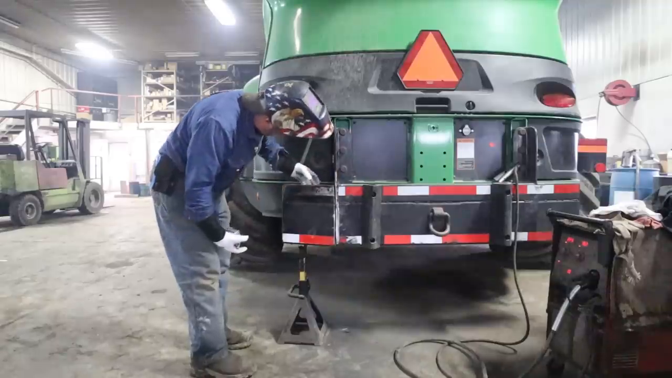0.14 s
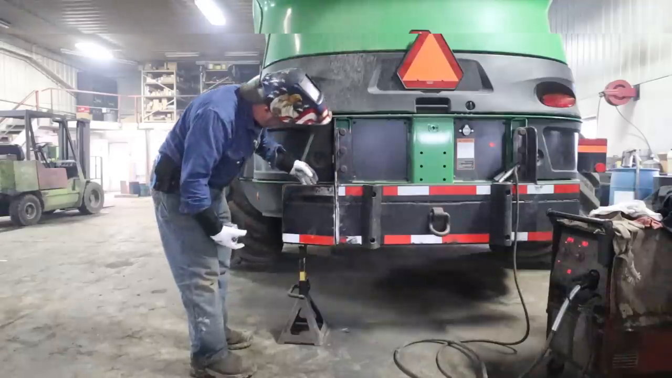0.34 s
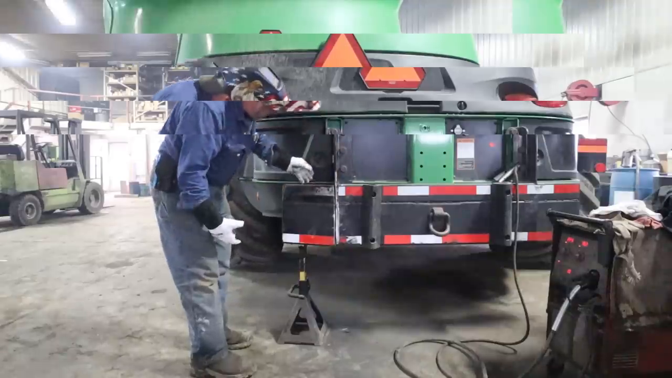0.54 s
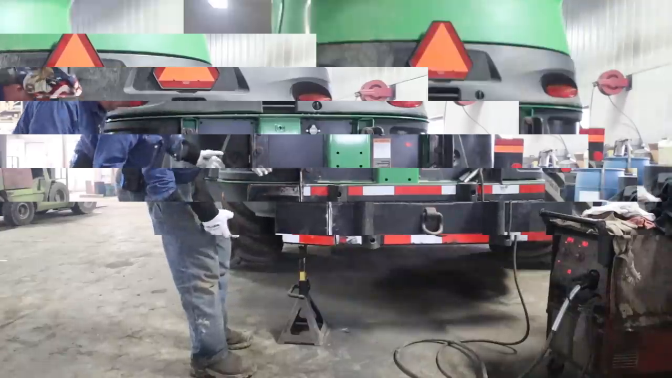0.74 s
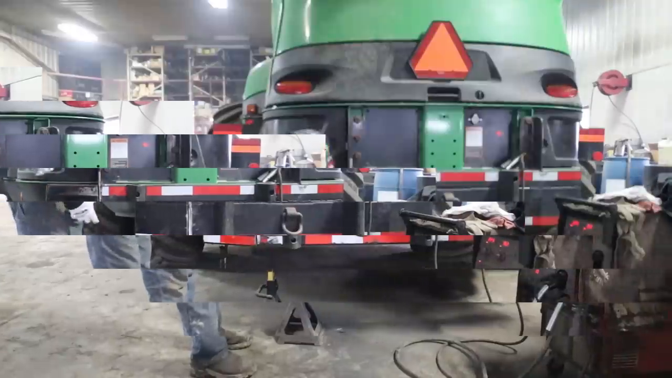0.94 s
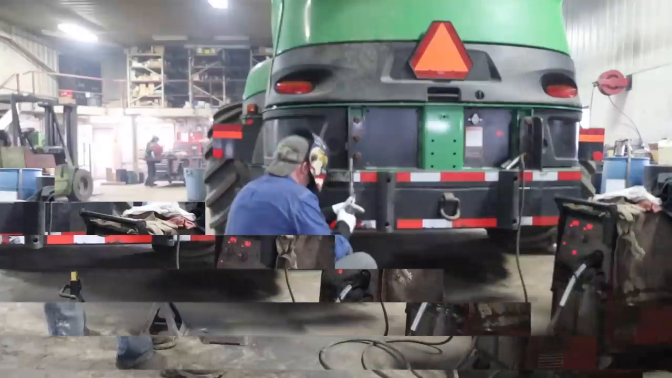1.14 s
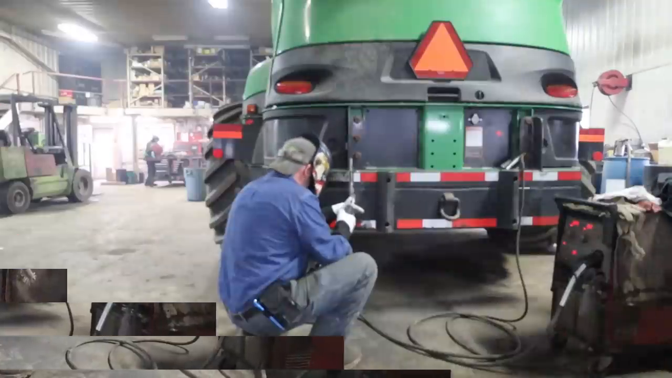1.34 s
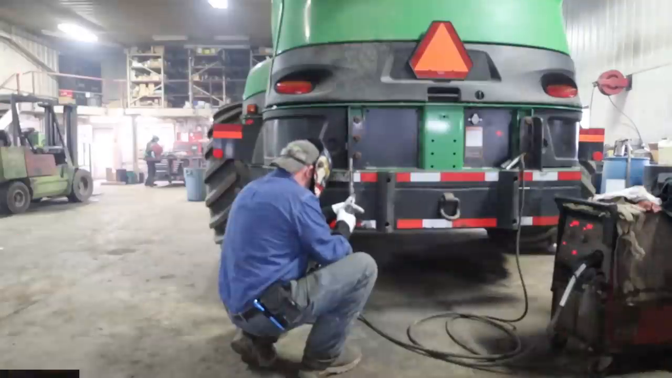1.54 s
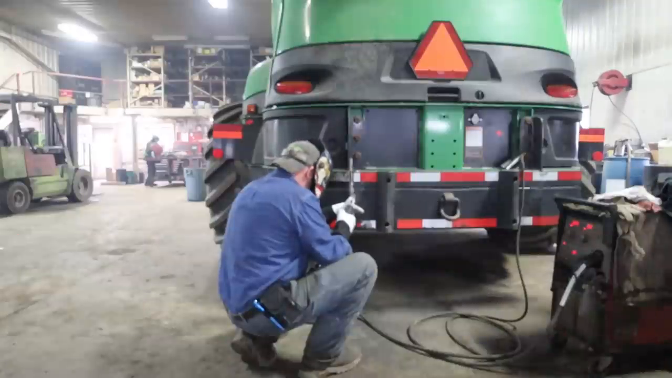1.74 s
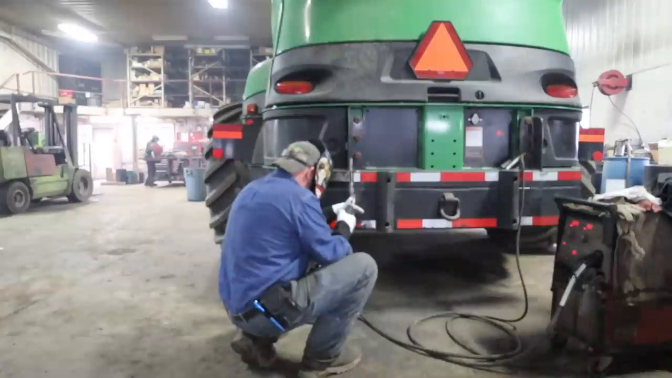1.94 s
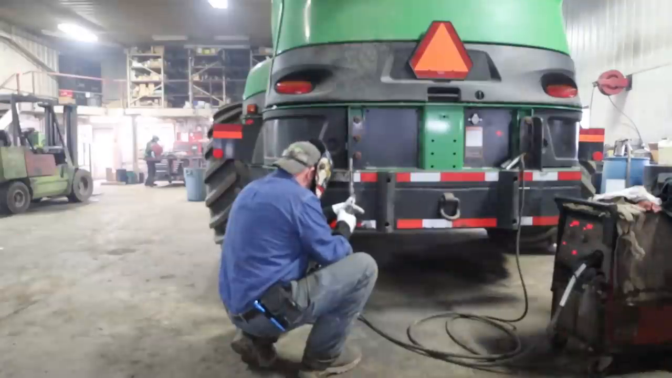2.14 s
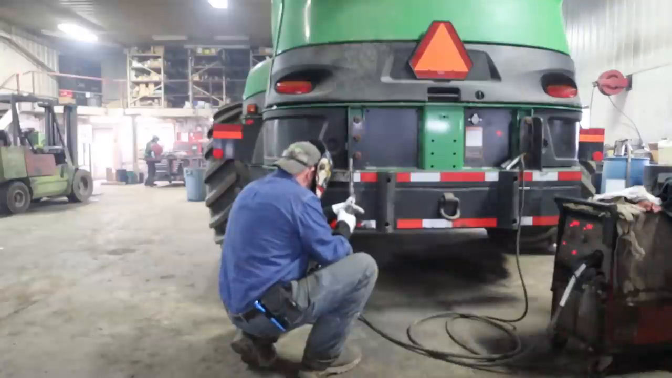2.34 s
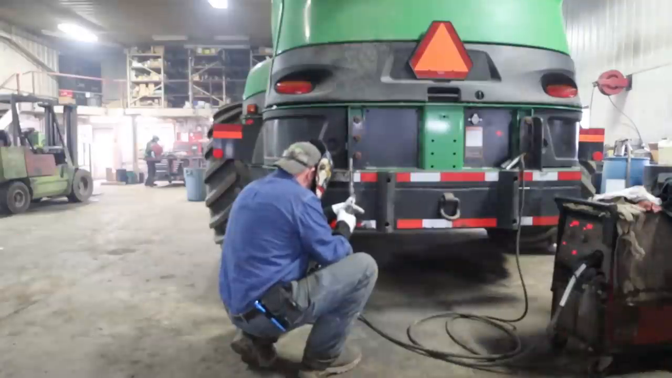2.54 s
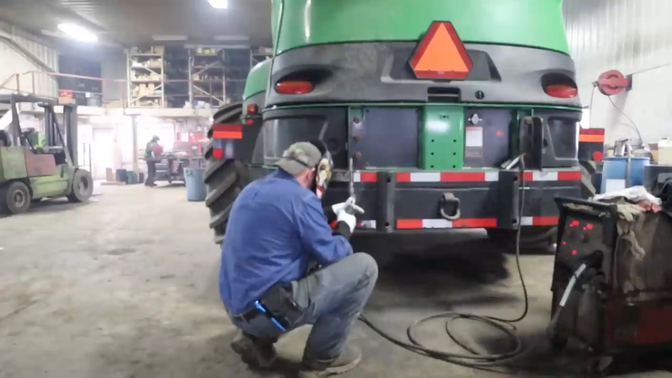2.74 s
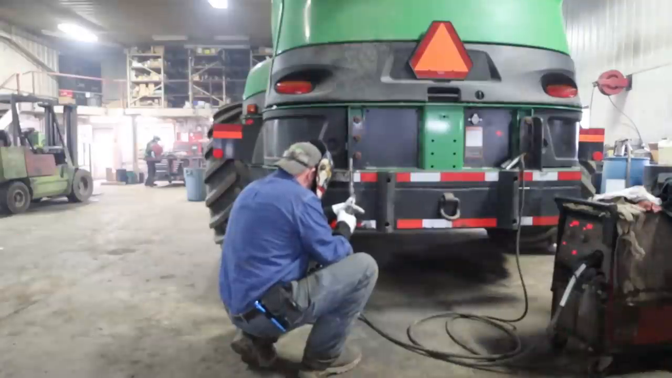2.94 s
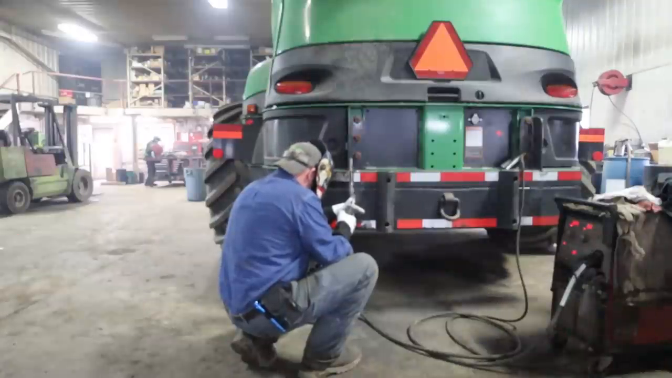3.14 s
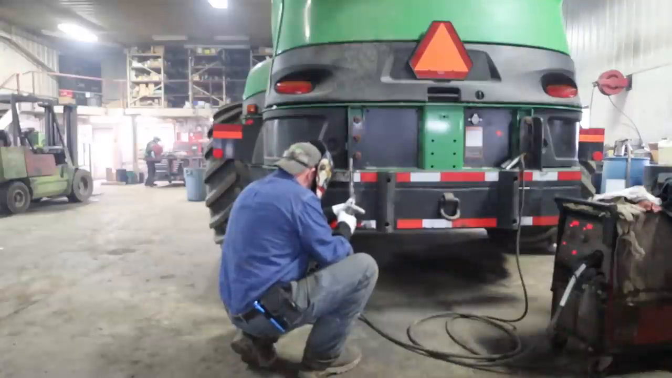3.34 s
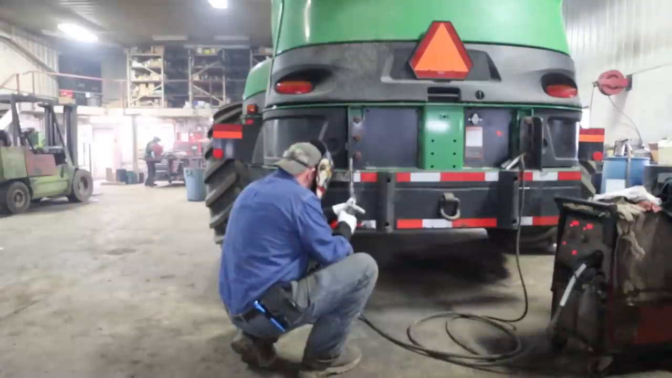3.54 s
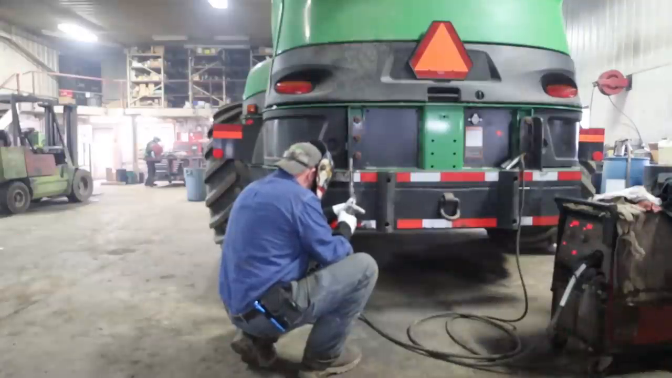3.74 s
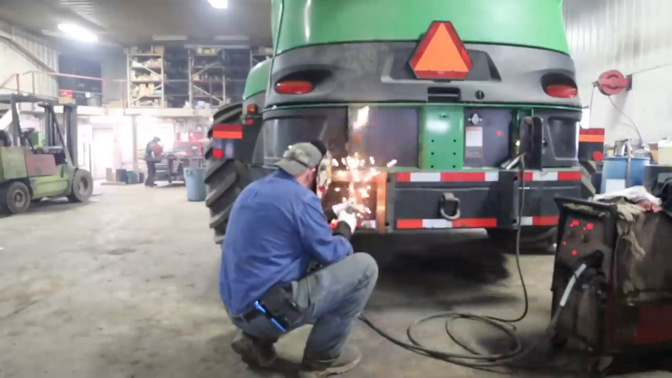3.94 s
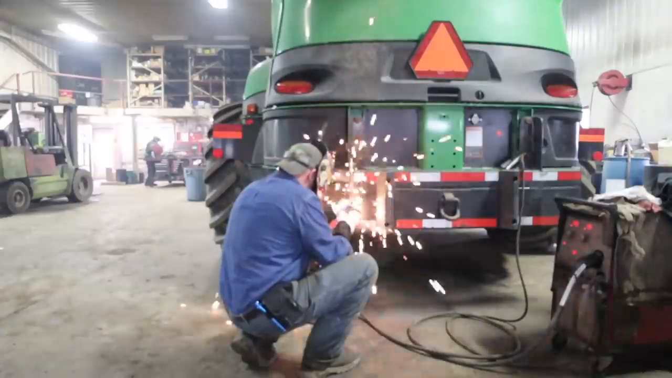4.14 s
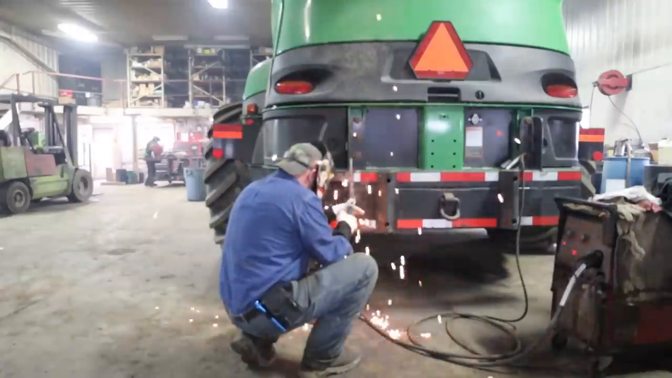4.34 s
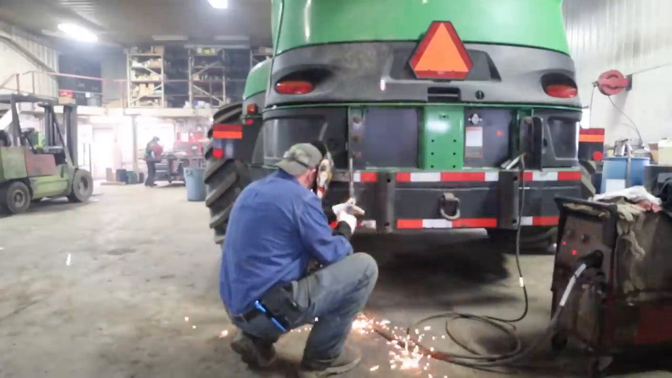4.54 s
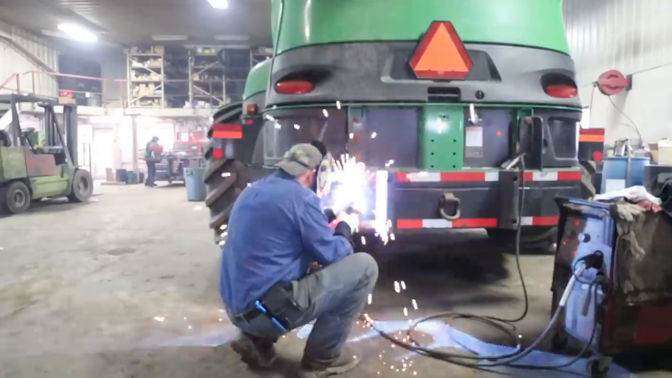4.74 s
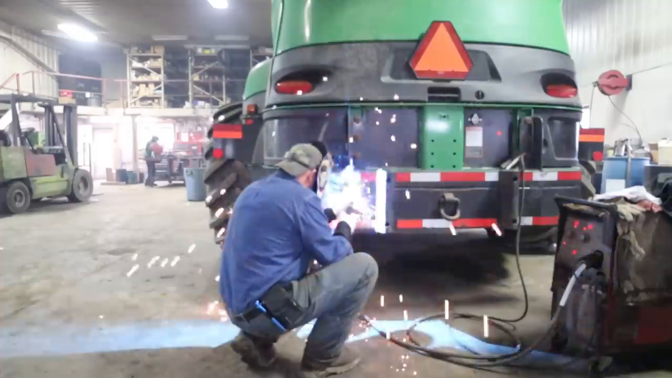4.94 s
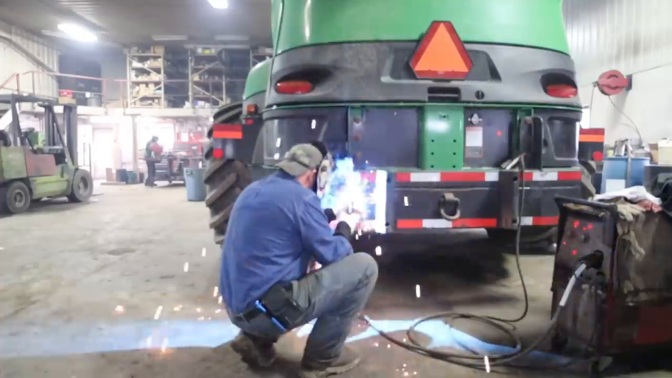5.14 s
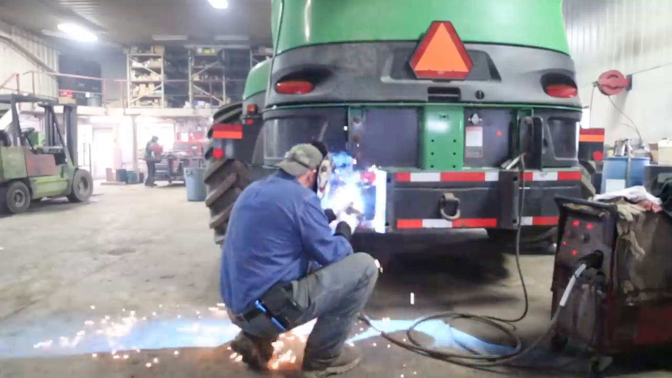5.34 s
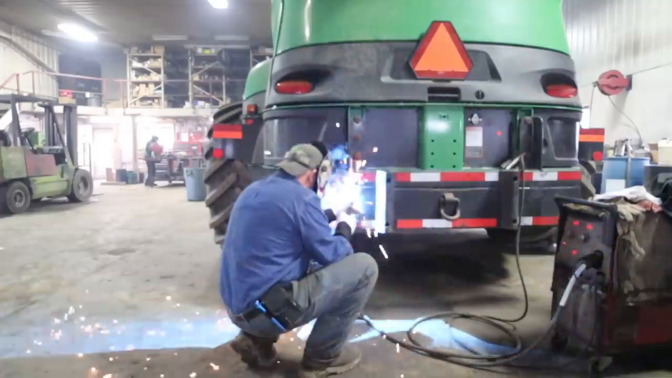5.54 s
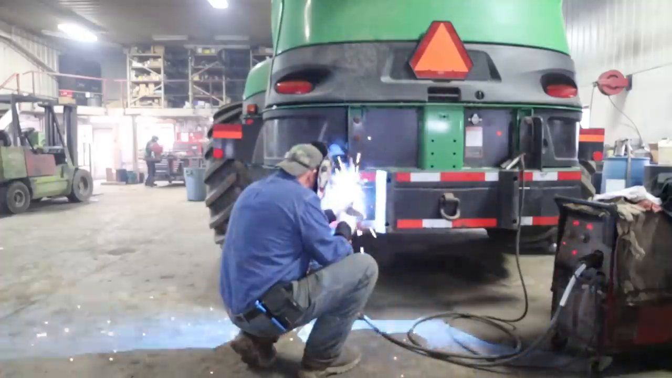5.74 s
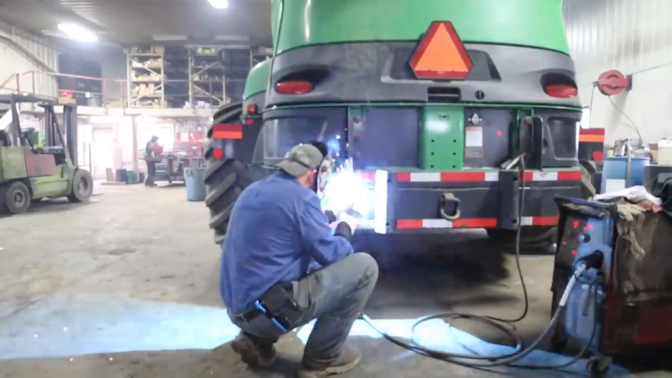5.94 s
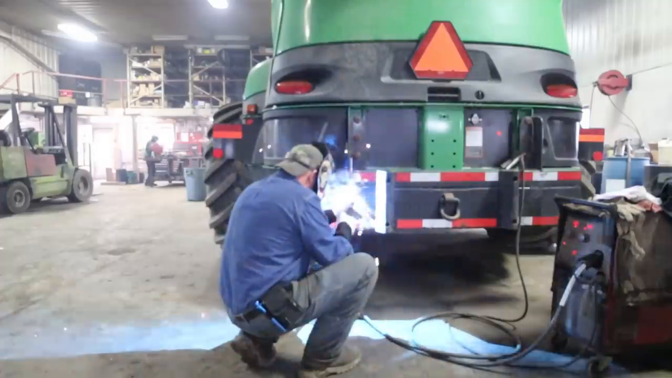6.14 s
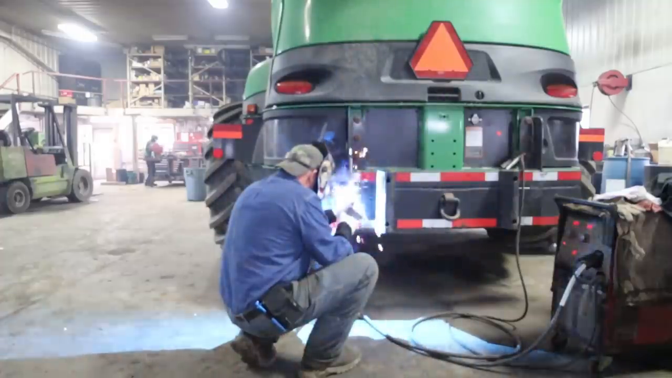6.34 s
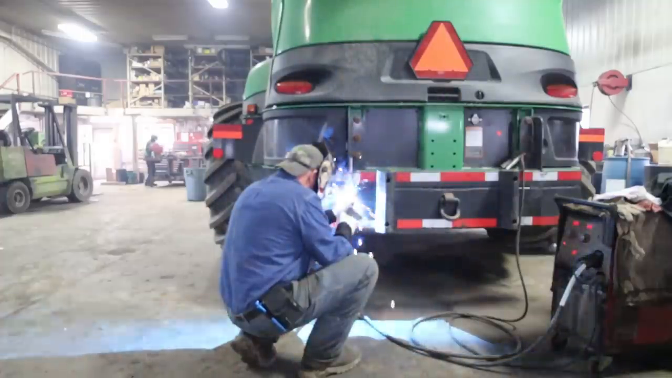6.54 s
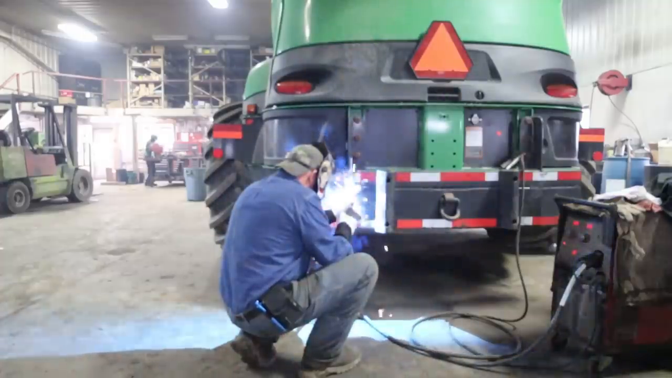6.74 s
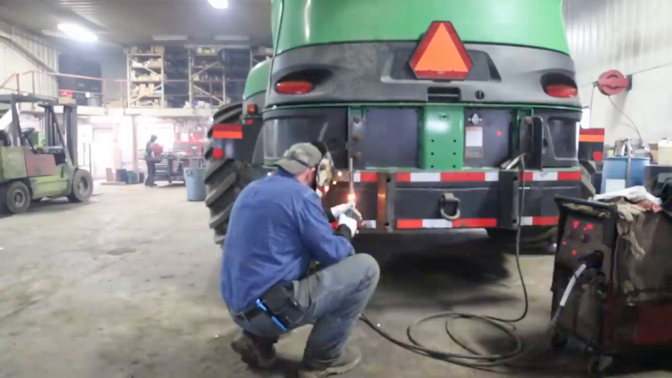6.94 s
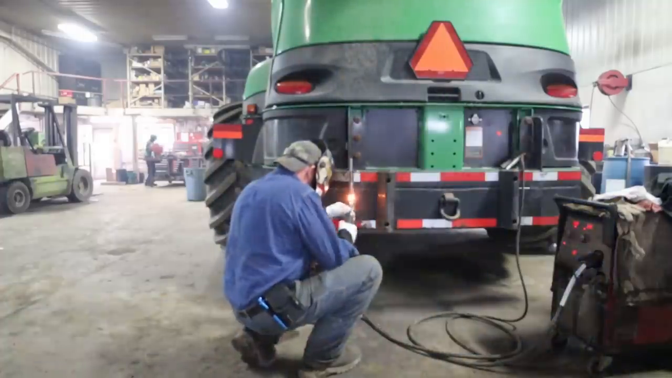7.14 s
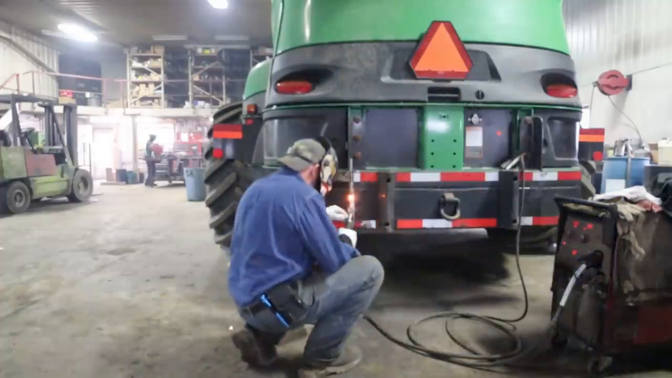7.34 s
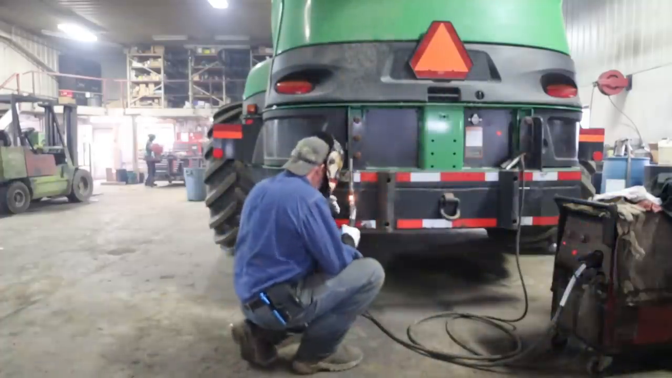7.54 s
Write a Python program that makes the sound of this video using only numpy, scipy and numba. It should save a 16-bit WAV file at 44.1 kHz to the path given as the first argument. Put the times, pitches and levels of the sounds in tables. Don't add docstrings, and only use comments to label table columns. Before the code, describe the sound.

In a big, hard-walled steel workshop, a grinder further off scrapes a bar with a bright ringing roar, whine and low hum, its tone changing early on. Around four seconds a welder a few metres away cracks sharply in bursts, pauses, strikes again, then buzzes and crackles rapidly for two seconds. The level dips under the cracks; grinding remains at the end.

```python
import sys
import numpy as np
from scipy import signal
from scipy.fft import rfft, irfft
from scipy.io import wavfile
from scipy.ndimage import uniform_filter1d, map_coordinates
from numba import njit

SR = 44100
rng = np.random.default_rng(int(sys.argv[2]) if len(sys.argv) > 2 else 0)


def boost_factor(decibels):
    exponent = np.asarray(decibels, float) / 20
    return 10 ** exponent


def generate_wav(sig):
    pcm = np.round(np.clip(np.atleast_2d(sig).T, -1, 1) * 32767).astype(np.int16)
    wavfile.write(sys.argv[1], SR, pcm)


N = 334278
T = np.arange(N) / SR
HZ = np.arange(N // 2 + 1) * SR / N + 1e-3

# start t/s, end t/s
FADE_S = (0.54, 0.95)
# t/s, speed/(turns per s)
SPIN = [(0, 141.3), (.9, 145), (1.45, 147.8), (1.9, 149.3), (2.55, 147.6), (2.8, 146.2), (3.2, 144.2),
        (3.8, 141.3), (4.3, 140.5), (7.58, 140.8)]
# f/Hz, width/Hz, level/dB
BAR_EARLY = [(2115, 23, -32.5), (2595, 60, -34), (3044, 24, -30.5), (4120, 20, -26.5), (3990, 60, -29),
             (4800, 145, -20.5), (6330, 95, -29.5), (7180, 160, -31.5), (8800, 170, -44), (10100, 150, -54),
             (11800, 250, -64), (13100, 300, -61), (14600, 200, -68)]
BAR_LATE = [(2450, 50, -31.5), (2924, 31, -33.5), (3320, 59, -39.5), (4000, 40, -33), (4140, 135, -34),
            (4920, 110, -21), (6285, 45, -21.5), (6120, 27, -29), (7425, 82, -31.5), (8850, 197, -37),
            (10360, 170, -44.5), (11540, 190, -50.5), (13400, 330, -46.5), (15000, 400, -63)]
# f/Hz, level/dB
ROAR_EARLY = [(30, -76), (80, -53), (250, -54), (700, -51.5), (1500, -46), (2800, -35.5), (4400, -35.5),
              (5600, -40.5), (8000, -53), (10800, -74), (15500, -79)]
ROAR_LATE = [(30, -78), (60, -52.5), (110, -43.5), (480, -42.5), (620, -46), (1200, -43), (2000, -38.5),
             (3000, -33), (3700, -39.5), (5700, -40), (8200, -48.5), (9600, -80), (12500, -66),
             (15500, -103)]
# f/Hz, level/dB
HUM_EARLY = [(91.5, -45.5), (457.6, -51)]
HUM_LATE = [(134.6, -41.5), (269.2, -45.5), (409.1, -44), (543.7, -40.5)]
# t/s, level/dB
SHOP_GAIN = [
    [(0, -14), (.3, -14.5), (.7, -14.5), (1, -15), (1.3, -13), (1.8, -12.5), (2.7, -12.5), (3.4, -13),
     (3.97, -12)],
    [(3.985, -11.5), (4.1, -16), (4.68, -18.5), (4.72, -20), (5.4, -21), (6, -23.5), (6.7, -24.5),
     (7.15, -23), (7.4, -21)],
]
# t/s, pop level/dB, spatter length/ms, spatter level over the pop/dB
STRIKES = [(3.9767, 7, 2.1, -6), (3.9784, 5, 2.7, 4.5), (4.0395, -16, 2.5, -10), (4.1281, 3.5, 9.5, 0),
           (4.1433, 3.5, 3.2, -1.5), (4.1547, 2, 3.6, -6), (4.178, -2, 3.9, -1.5), (4.688, 7, 2.23, -5),
           (4.705, -20, 2.6, -14), (4.834, -18, 3.4, 4), (4.858, -11, 3.9, 2.5), (4.945, -11.5, 3.5, 1),
           (4.8251, -16, 1.2, -19), (4.8334, -1.5, 0.74, -11), (4.8404, -14, 1.2, -19),
           (4.8575, -8, 1.8, -19), (4.8757, -17, 1.2, -19), (6.899, -9, 6.4, -2)]
# arc on t/s, arc off t/s
ARC_S = (4.9, 6.9)
# t/s, level/dB, droplets up to the next (count), droplet level/dB
SHORTS = [(4.9079, -13, 0, -12), (4.9196, -1, 10, -9), (5.0177, -2, 1, -4), (5.0373, -15, 8, -10),
          (5.1041, -3, 13, -10), (5.2192, -5, 5, -10), (5.2748, -8, 10, -10), (5.4148, -10, 4, -8),
          (5.4701, -9, 4, -8), (5.5367, -3, 1, -5), (5.5598, 0, 5, -6), (5.6385, -7, 2, -11),
          (5.6708, -5, 15, -7), (5.8513, -12, 4, -7), (5.8942, -11, 2, -4), (5.9412, -9, 1, -17),
          (5.96, -7, 2, -6), (6.0104, -1, 0, -12), (6.0238, -5, 4, -8), (6.0692, -2, 4, -8),
          (6.1207, -4, 1, -12), (6.1554, 1, 9, -10), (6.253, -3, 8, -12), (6.3396, -7, 9, -12),
          (6.4443, -13, 7, -10), (6.5144, -11, 0, -12), (6.5355, -8, 11, -11), (6.6473, -9, 8, -10),
          (6.7399, 0, 16, -9), (6.8999, -16, 0, -12)]
# delay/ms, level/dB
ECHOES = [(.33, -9), (.59, -14), (1.94, -9), (2.14, -10), (3.265, -12.5), (4.575, -15.5), (6.46, -24)]

FAST_TURNS, FAST_WHINE_DB, FAST_RING_HZ, FAST_RING_DB = (142.6, 149), 9, 6270, 5.5
EASE_S, EASE_DB, EASE_HZ, EASE_WIDTH_HZ, HUM_LATER_DB = (3, 4.4), -2.5, 2920, 760, -2
FAR_T60_S, FAR_DB, FAR_FROM_HZ = .3, -4, 4300
ARC_RUMBLE_DB, ARC_HISS_DB, LIFT_RISE_S, LIFT_FALL_S = 3, 3.5, 0.53, .02
BEAT_JITTER_MS, BEAT_SCATTER_DB = .5, 2.2
POP_SPATTER_MS, POP_SPATTER_DB = 1.2, -16.5
BODY_DB, BODY_FOLLOW = -9, .35
NOZZLE_HZ, NOZZLE_WIDTH_HZ, NOZZLE_DB = 7710, 1140, 23.5
BOX_HZ, BOX_WIDTH_HZ, BOX_DB, BOX_MS, STRIKE_BOX_DB = 430, 48, 12.5, 1.54, -20
THUD_HZ, THUD_WIDTH_HZ, THUD_DB = 480, 1700, 3
HALL_T60_S, HALL_DB = 0.49, -6.5


def noise():
    return rng.standard_normal(N)


def shape(x, gain):
    return irfft(rfft(x) * gain, N)


def resonance(hz, width_hz):
    return 1 / (1 + 1j * (HZ / hz - hz / HZ) * hz / width_hz)


def delay(ms):
    return np.exp(-2j * np.pi * HZ * ms / 1000)


def walk(rate):
    k = int(SR / rate)
    held = np.repeat(rng.standard_normal(N // k + 1), k)
    return 1.3 * uniform_filter1d(uniform_filter1d(held, k), k)[:N]


def decaying_tail(t60_s, start_s=-1):
    tail = noise() * boost_factor(-60 * T / t60_s) * (T > start_s)
    return rfft(tail / np.sqrt(np.sum(tail ** 2)))


def disc(turns, wear_s=.22):
    rim = rng.standard_normal((40, 300))
    rub = map_coordinates(rim, [T / wear_s, turns % 1 * 300], order=1, mode="grid-wrap")
    return rub / rub.std()


def bar_rings(bar, rub, fast, bright_db):
    out = 0
    for hz, width_hz, db in bar:
        ring = shape(noise() + rub, resonance(hz, width_hz))
        lift_db = bright_db * np.clip((hz - 5500) / 3000, 0, 1)
        if abs(hz / FAST_RING_HZ - 1) < 1 / 25:
            lift_db = lift_db + FAST_RING_DB * fast
        swell_db = 0.93 * walk(2.924) + 1.54 * walk(30)
        out = out + boost_factor(db + lift_db + swell_db) * ring
    return out


def grinding_roar(roar, rub, rumble_db, bright_db):
    grit = noise() * boost_factor(rng.exponential(size=N))
    grit = grit / grit.std()
    hz, db = np.transpose(roar)
    colour = boost_factor(np.interp(np.log(HZ), np.log(hz), db))
    low = 1 / (1 + (HZ / 1100) ** 4)
    high = 1 / (1 + (6500 / HZ) ** 6)
    middle = np.clip(1 - low - high, 0, 1)
    rumble = boost_factor(rumble_db + 1.2 * walk(7.6)) * shape(noise(), colour * np.sqrt(low))
    scrape = boost_factor(1.1 * walk(8.5)) * shape(grit + rub, colour * np.sqrt(middle))
    hiss = boost_factor(bright_db + 0.74 * walk(8.6)) * shape(grit, colour * np.sqrt(high))
    return rumble + scrape + hiss


def vane_whine(turns, fast, whine_db):
    return boost_factor(whine_db + FAST_WHINE_DB * fast + 2.5 * walk(9)) * np.sin(2 * np.pi * 20 * turns)


def motor_hum(hum):
    waver = np.cumsum(1 + .004 * walk(5)) / SR
    lines = sum(boost_factor(db + 1.8 * walk(14)) * np.sin(2 * np.pi * hz * waver) for hz, db in hum)
    return lines * boost_factor(np.interp(T, EASE_S, [0, HUM_LATER_DB]))


def far(x):
    treble = 1 / (1 + (FAR_FROM_HZ / HZ) ** 4)
    paths = boost_factor(FAR_DB) * decaying_tail(FAR_T60_S) * treble
    return shape(x, (1 + paths) / np.sqrt(1 + boost_factor(2 * FAR_DB) * treble ** 2))


def grinder(bar, roar, hum, rumble_db, bright_db, whine_db):
    speed = np.interp(T, *np.transpose(SPIN))
    turns = np.cumsum(speed * (1 + .0012 * walk(8))) / SR
    fast = np.interp(speed, FAST_TURNS, [-1, 0])
    rub = boost_factor(-3) * shape(disc(turns), resonance(3100, 3000) ** 2)
    scraping = bar_rings(bar, rub, fast, bright_db) + grinding_roar(roar, rub, rumble_db, bright_db)
    whine = vane_whine(turns, fast, whine_db)
    return far(scraping) * boost_factor(37.5) + whine * boost_factor(25.0) + motor_hum(hum) * boost_factor(15.5)


def clicks(s, size):
    at = np.asarray(s) * SR
    i, part = at.astype(int), at % 1
    first = np.bincount(i, size * (1 - part), N + 2)[:N]
    return first + np.bincount(i + 1, size * part, N + 2)[:N]


def droplets():
    rows = []
    for (s, db, count, beat_db), after in zip(SHORTS, SHORTS[1:] + SHORTS[-1:]):
        beat = np.linspace(s, after[0], int(count) + 2)[1:-1]
        chance = rng.standard_normal((len(beat), 2)).clip(-2, 2)
        beat_s = beat + BEAT_JITTER_MS / 1000 * chance[:, 0]
        rows += [(s, db)] + list(zip(beat_s, beat_db + BEAT_SCATTER_DB * chance[:, 1]))
    return rows


def spatter_spits(s, db, spatter_ms, spatter_db):
    late = s[:, None] + spatter_ms[:, None] / 1000 * rng.random((len(s), 12)) ** 1.3
    spit = boost_factor(db + spatter_db)[:, None] * rng.uniform(-1, 1, (len(s), 12))
    return clicks(late.ravel(), spit.ravel())


def arc_sizzle():
    when = rng.uniform(*ARC_S, size=2500)
    return clicks(when, boost_factor(-36 + 1.5 * rng.exponential(size=2500)))


def arc():
    pops = [(t, d, POP_SPATTER_MS, POP_SPATTER_DB) for t, d in droplets()]
    s, db, spatter_ms, spatter_db = np.transpose(STRIKES + pops)
    spatter = spatter_spits(s, db, spatter_ms, spatter_db)
    body_db = np.where(s < ARC_S[0], db, BODY_DB + BODY_FOLLOW * (db - BODY_DB))
    snap = clicks(s, boost_factor(body_db + 4.3 * rng.random(len(s)))) + spatter + arc_sizzle()
    ring = clicks(s, boost_factor(db + 2.5)) + spatter

    cold = T < ARC_S[0]
    rise = 1j * HZ / 390
    snap_colour = boost_factor(12.5) / (1 + 1j * HZ / 5600) * (rise / (1 + rise)) ** 2
    paths = 1 + sum(boost_factor(d) * delay(ms) for ms, d in ECHOES)
    box = boost_factor(BOX_DB) * resonance(BOX_HZ, BOX_WIDTH_HZ) * delay(BOX_MS)
    box_drive = snap * np.where(cold, boost_factor(STRIKE_BOX_DB), 1)
    direct = shape(snap, snap_colour * paths) + shape(box_drive, box)
    thud = boost_factor(THUD_DB) * shape(snap * cold, resonance(THUD_HZ, THUD_WIDTH_HZ))
    nozzle = resonance(NOZZLE_HZ, NOZZLE_WIDTH_HZ) ** 2 * delay(.03)
    beam = boost_factor(NOZZLE_DB) * shape(ring, nozzle)
    into_hall = (direct + 0.72 * beam) * np.where(cold, boost_factor(-4), 1)
    hall = shape(into_hall, decaying_tail(HALL_T60_S, .008) / (1 + 1j * HZ / 9000))
    return -(direct + thud + beam + boost_factor(HALL_DB) * hall)


def scene():
    gain_db = np.interp(T, *np.vstack(SHOP_GAIN).T)
    lift_s = [ARC_S[0] - LIFT_RISE_S, ARC_S[0], ARC_S[1], ARC_S[1] + LIFT_FALL_S]
    burning = np.interp(T, lift_s, [0, 1, 1, 0])
    rumble_db, bright_db = ARC_RUMBLE_DB * burning, ARC_HISS_DB * burning
    early = grinder(BAR_EARLY, ROAR_EARLY, HUM_EARLY, rumble_db + 1.5, bright_db + 1.0, whine_db=-40)
    late = grinder(BAR_LATE, ROAR_LATE, HUM_LATE, rumble_db + 0.35, bright_db + 1.63, whine_db=-38)
    eased = 1 - boost_factor(np.interp(T, EASE_S, [0, EASE_DB]))
    late = late - eased * shape(late, resonance(EASE_HZ, EASE_WIDTH_HZ))
    later = np.clip((T - FADE_S[0]) / (FADE_S[1] - FADE_S[0]), 0, 1)
    shop = boost_factor(gain_db) * ((1 - later) * early + later * late)
    return (shop + arc())[None]


@njit
def gain_control(x, top, attack, release):
    y, e = np.empty(len(x)), 0.
    for i in range(len(x)):
        e += (abs(x[i]) - e) * (attack if abs(x[i]) > e else release)
        y[i] = x[i] * min(1., top / (e + 1e-9))
    return y


def low_pass(x):
    return signal.sosfilt(signal.butter(12, 16510, fs=SR, output="sos"), x)


def record(dry):
    held = gain_control(dry[0], 0.59, 1 / (0.0012 * SR), 1 / (.06 * SR))
    top_cut = np.clip((15780 - HZ) / 60, 0, 1) * np.where(HZ > 15100, boost_factor(-4), 1)
    held = shape(held, top_cut)
    return low_pass(np.clip(held, -1, 1)[None])


dry = scene()
out = record(dry)
generate_wav(out)
```